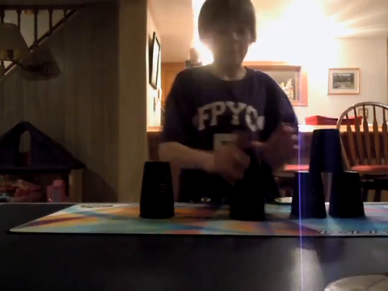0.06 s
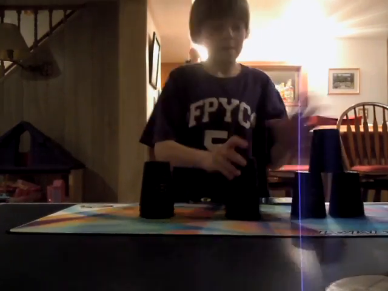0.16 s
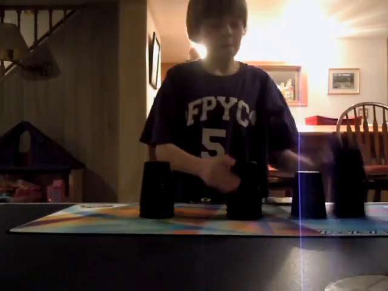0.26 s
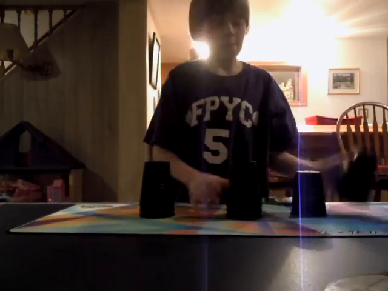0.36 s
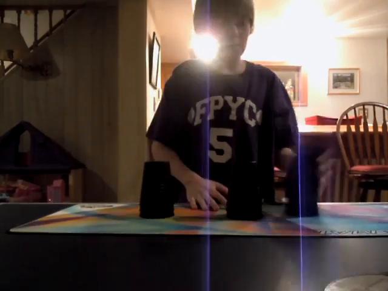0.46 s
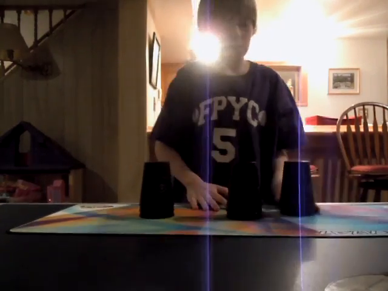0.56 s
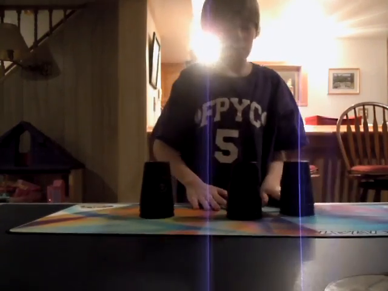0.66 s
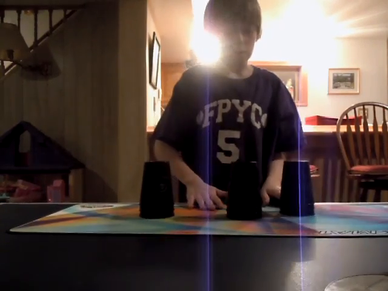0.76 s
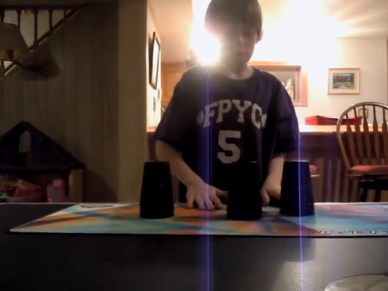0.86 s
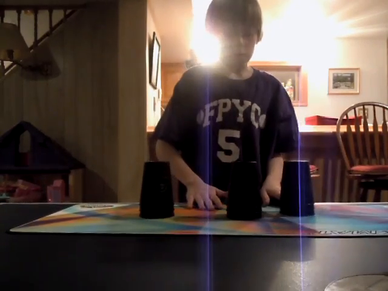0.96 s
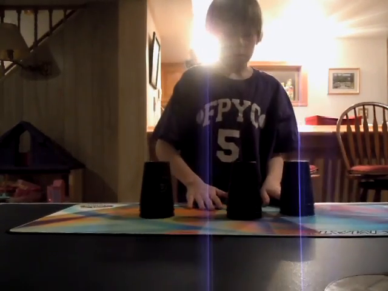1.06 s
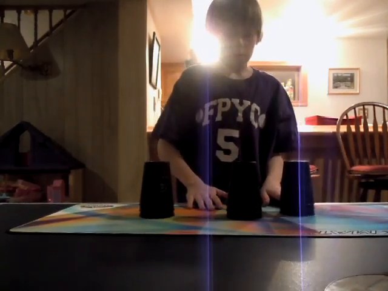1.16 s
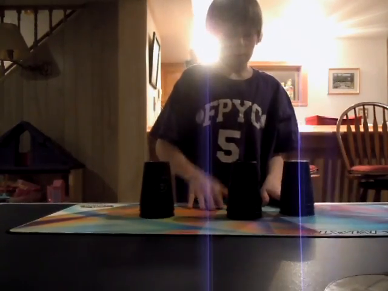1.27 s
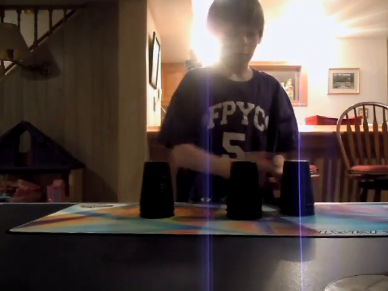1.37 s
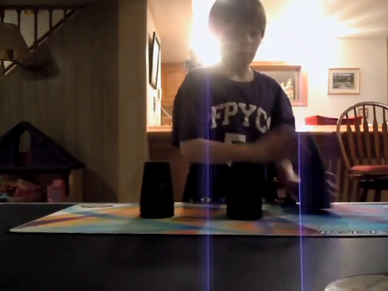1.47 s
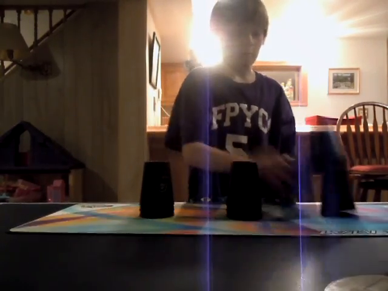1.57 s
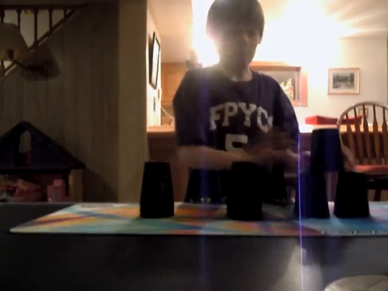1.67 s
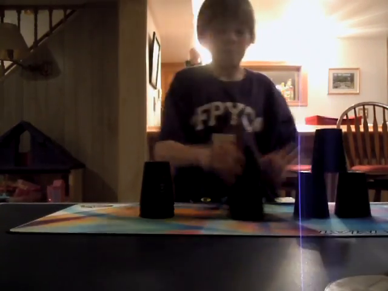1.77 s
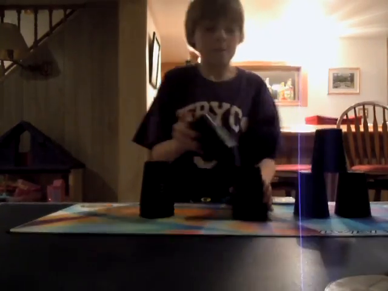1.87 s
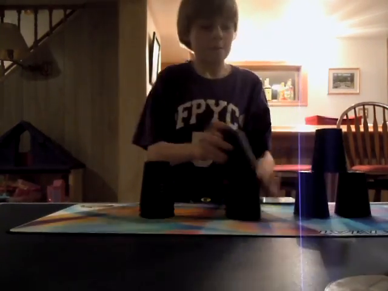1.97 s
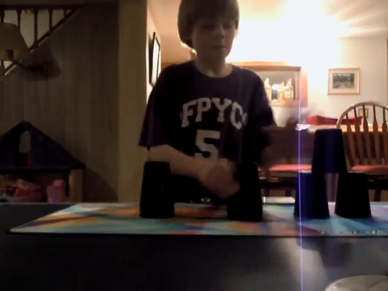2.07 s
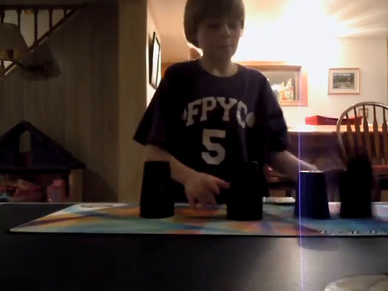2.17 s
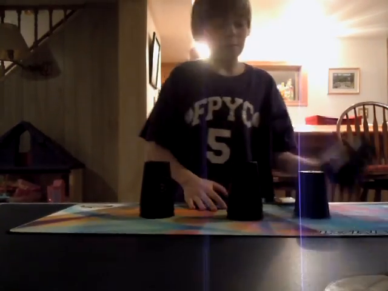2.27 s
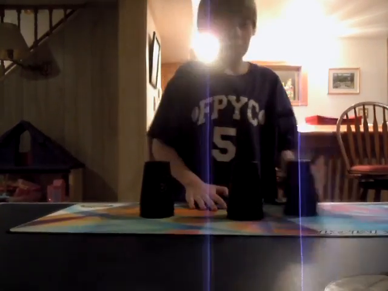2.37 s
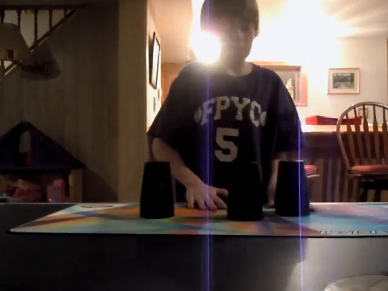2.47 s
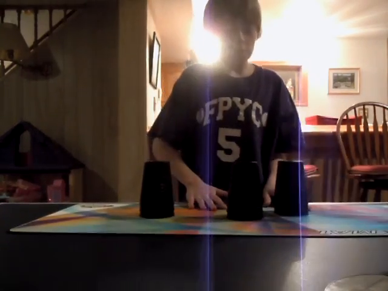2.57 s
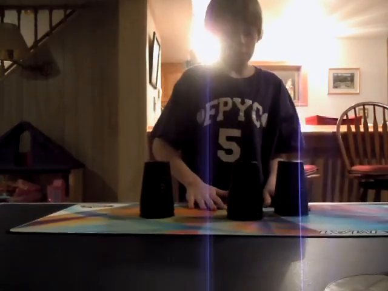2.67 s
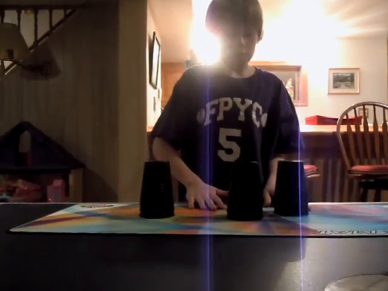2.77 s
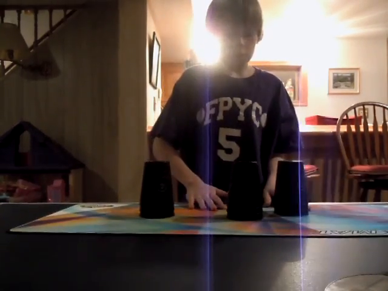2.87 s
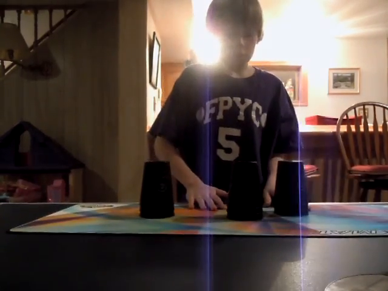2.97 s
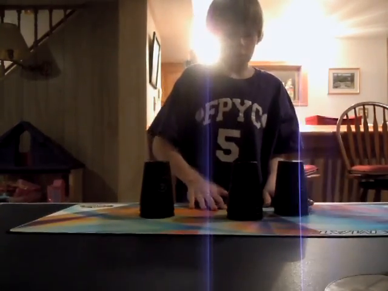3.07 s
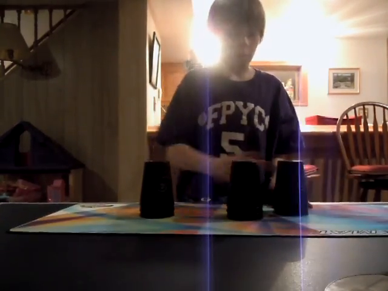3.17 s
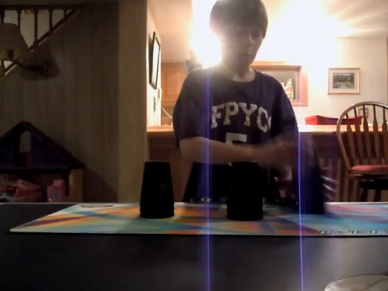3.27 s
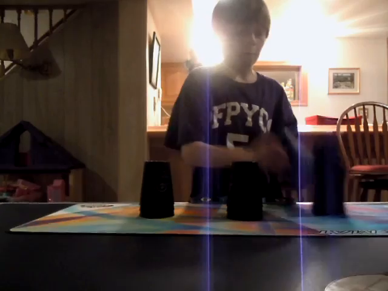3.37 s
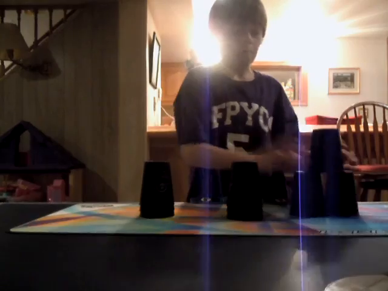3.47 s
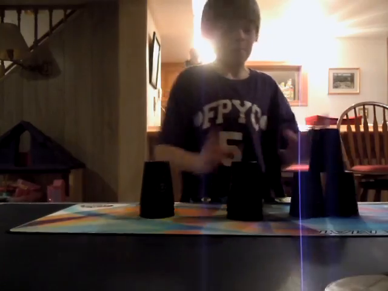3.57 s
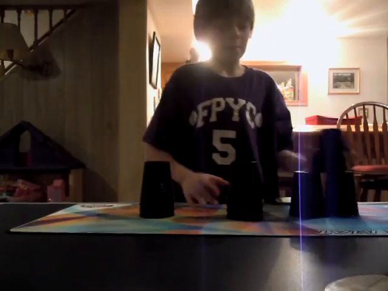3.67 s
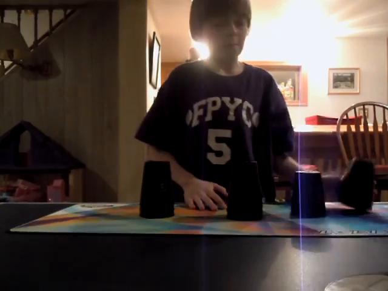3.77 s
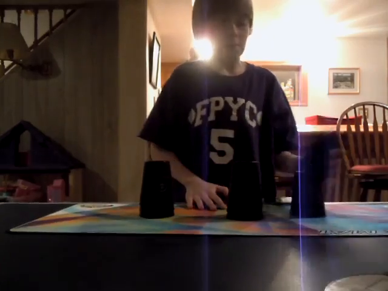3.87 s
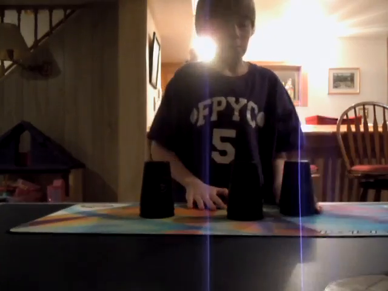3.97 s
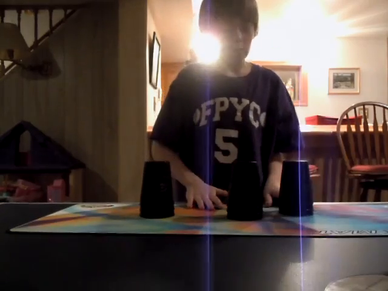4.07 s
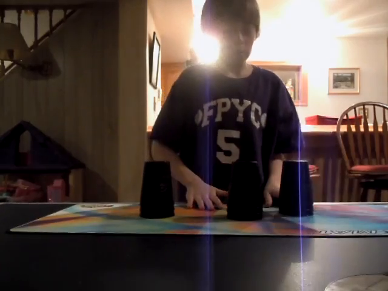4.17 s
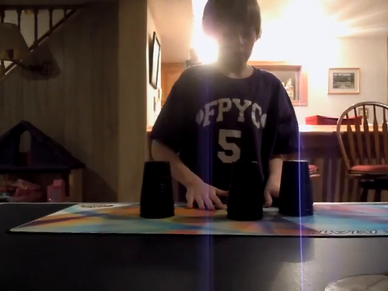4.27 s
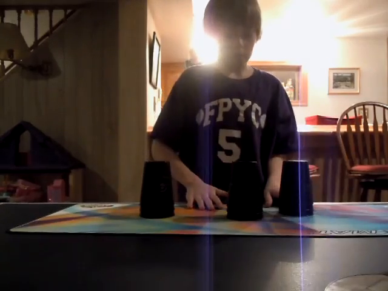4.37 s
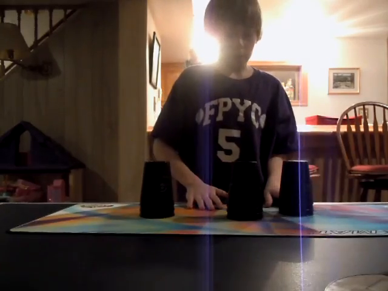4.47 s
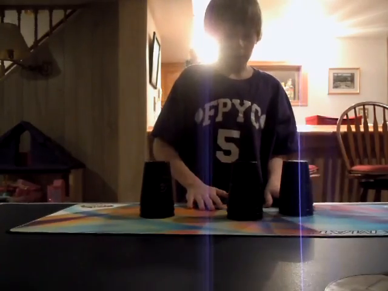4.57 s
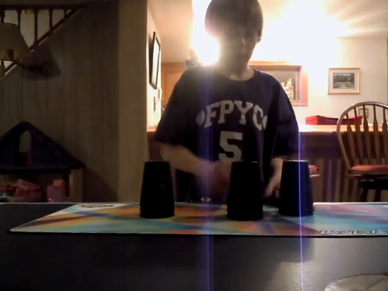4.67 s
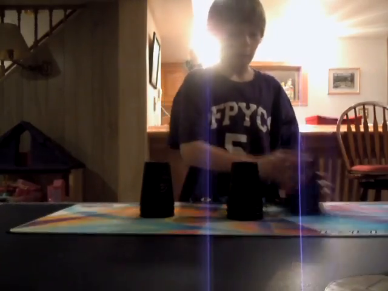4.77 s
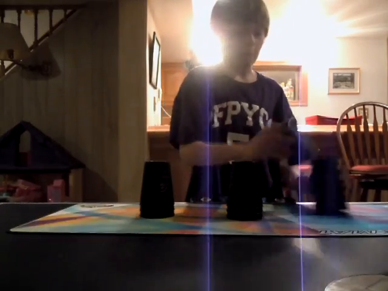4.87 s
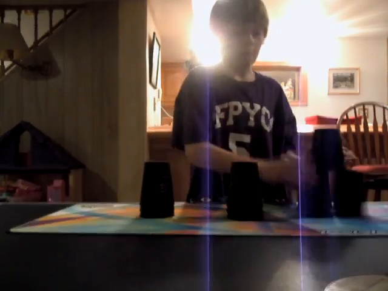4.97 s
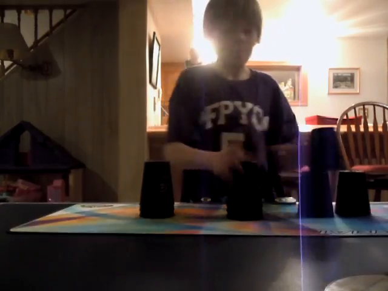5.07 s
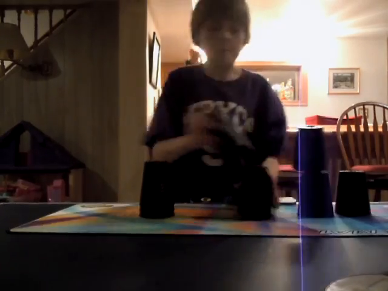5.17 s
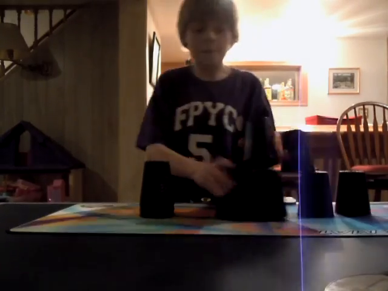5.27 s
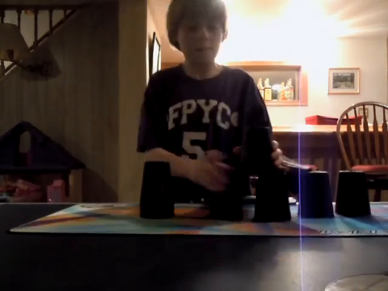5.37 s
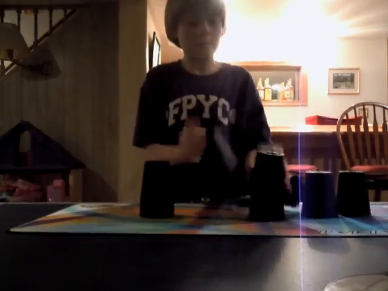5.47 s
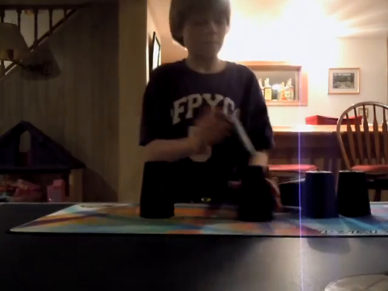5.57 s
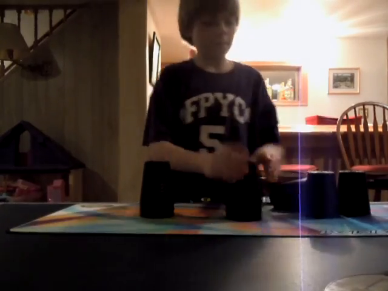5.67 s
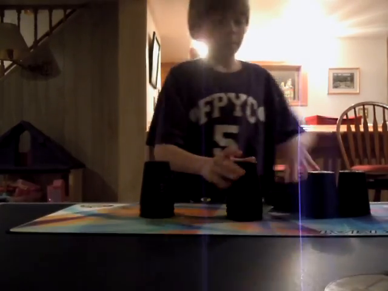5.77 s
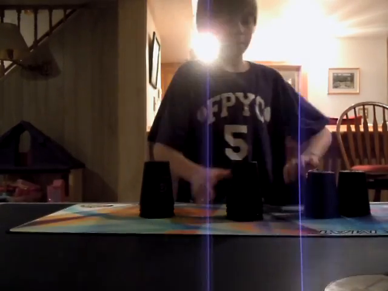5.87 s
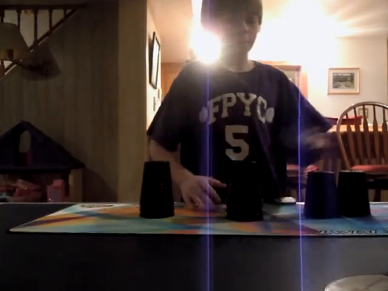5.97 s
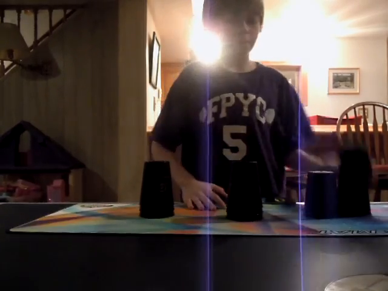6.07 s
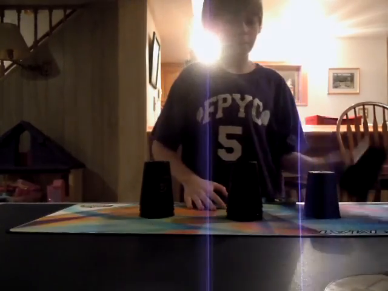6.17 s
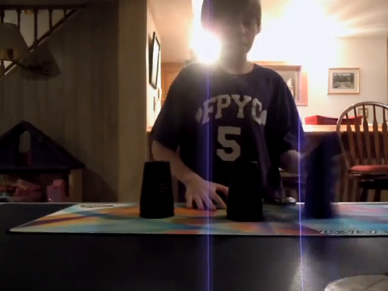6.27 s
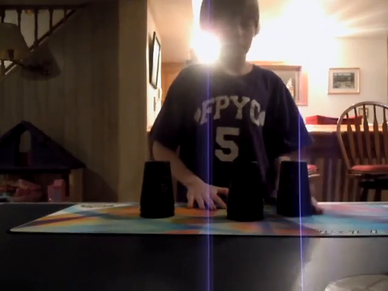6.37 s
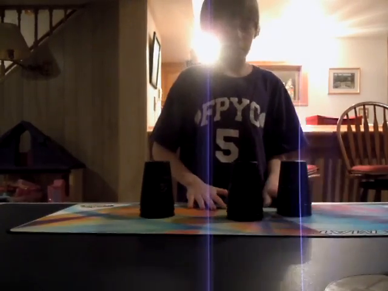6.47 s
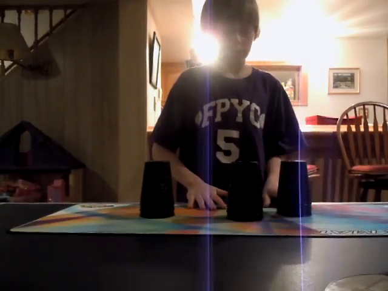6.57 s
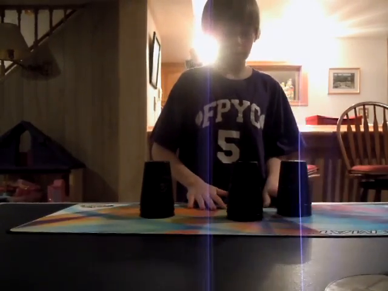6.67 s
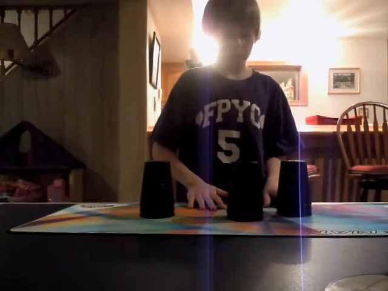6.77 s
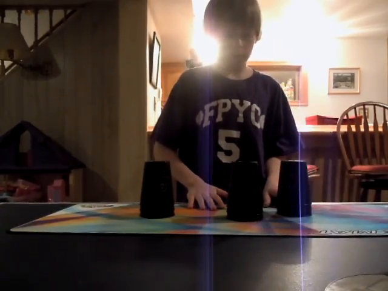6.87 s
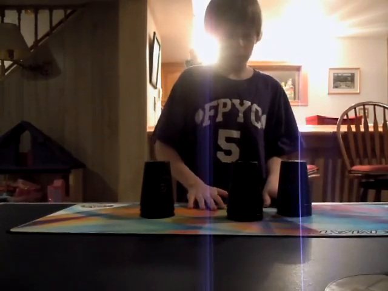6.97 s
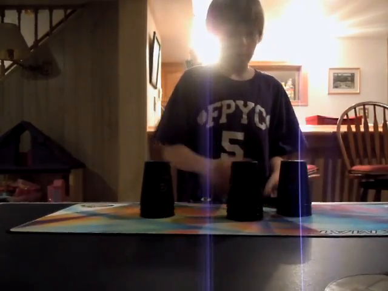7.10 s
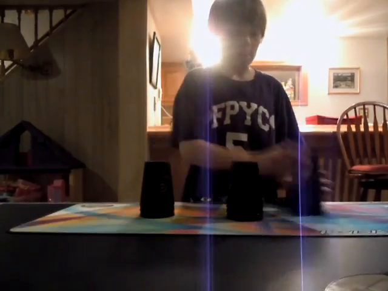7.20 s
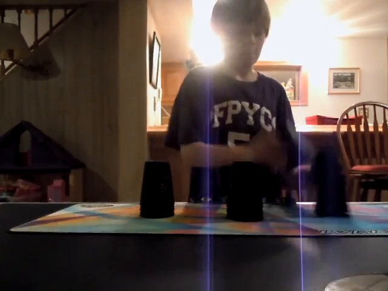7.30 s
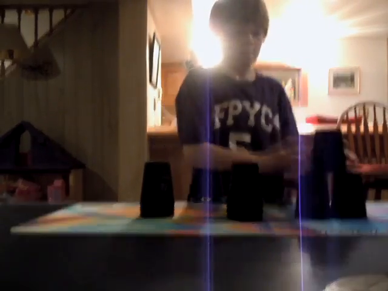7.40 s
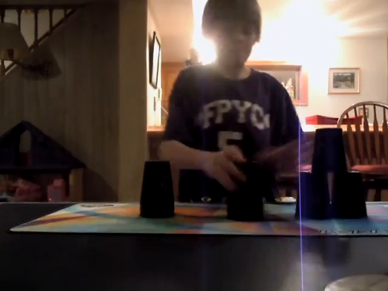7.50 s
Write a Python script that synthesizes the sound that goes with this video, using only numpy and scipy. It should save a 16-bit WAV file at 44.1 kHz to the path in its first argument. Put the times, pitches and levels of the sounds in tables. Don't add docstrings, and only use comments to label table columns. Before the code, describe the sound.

Hard plastic cups clack, slap and nest in rapid hollow bursts on a table mat, with short near-silent pauses, in a small room.

```python
import sys
import numpy as np
from scipy import signal
from scipy.fft import rfft, irfft
from scipy.io import wavfile
from scipy.ndimage import uniform_filter1d

SR = 44100
rng = np.random.default_rng(int(sys.argv[2]) if len(sys.argv) > 2 else 0)


def amplitude_ratio(level_db):
    exponent = np.asarray(level_db, float) / 20
    return 10 ** exponent


def digitize_waveform(pressure):
    field = np.atleast_2d(pressure).T
    bounded = np.clip(field, -1, 1)
    quanta = np.round(bounded * 32767).astype(np.int16)
    wavfile.write(sys.argv[1], SR, quanta)


N = 332514


def evened(x):
    return x / np.sqrt(np.mean(x ** 2) + 1e-20)


def peak_at(x, db):
    return amplitude_ratio(db) * x / abs(x).max()


def read(points, hz):
    f, value = np.transpose(points)
    return np.interp(np.log(hz + 1), np.log(f + 1), value)


def add(mix, s, sound):
    part = mix[max(round(s * SR), 0):][:len(sound)]
    part += sound[:len(part)]


def fade(t60, size):
    return amplitude_ratio(-60 * np.arange(size) / SR / max(t60, .003))


def ring(x, hz, t60):
    r = amplitude_ratio(-60 / max(t60, .003) / SR)
    w = 2 * np.pi * hz / SR
    return signal.lfilter([np.sin(w)], [1, -2 * r * np.cos(w), r * r], x)


def colour(points, size=512):
    hz = abs(np.fft.fftfreq(4096, 1 / SR))
    log_gain = np.log(amplitude_ratio(read(points, hz)) + 1e-5)
    return np.fft.ifft(np.exp(np.conj(signal.hilbert(log_gain)))).real[:size]


def hiss(points, likeness):
    hz = np.fft.rfftfreq(N, 1 / SR)
    left, other = rfft(rng.standard_normal((2, N)))
    same = np.clip(read(likeness, hz), 0, 1)
    right = same * left + np.sqrt(1 - same ** 2) * other
    return evened(irfft(np.array([left, right]) * amplitude_ratio(read(points, hz)), N))


def swell(start, end, db, rise_db, fall_db):
    t = np.arange(0, N, 256)[:, None] / SR
    rise = rise_db * np.maximum(start - t, 0)
    fall = fall_db * np.maximum(t - end, 0)
    power = amplitude_ratio(db - rise - fall) ** 2
    return np.interp(np.arange(N) / SR, t[:, 0], np.sqrt(power.sum(axis=1)))


# pitch_hz [Hz], level_db [dB per Hz]
HISS_TONE = [(29, -15.5), (50, 5.5), (292, -14.5), (776, -26.5), (1220, -30.5), (3170, -32.5), (3570, -34),
             (4020, -38.5), (13600, -39), (14900, -45)]
# pitch_hz [Hz], likeness [0 to 1]
HISS_LIKENESS = [(60, 0.92), (600, 0.8), (3000, 0.3), (6600, .05)]
# pitch_hz [Hz], level_db [dB]
WHINE = [(7838, -80), (7897, -85.5)]


def room_tone():
    t = np.arange(N) / SR
    whine = sum(amplitude_ratio(db) * np.sqrt(2) * np.sin(2 * np.pi * hz * t) for hz, db in WHINE)
    return amplitude_ratio(-56) * hiss(HISS_TONE, HISS_LIKENESS) + whine


# pitch_hz [Hz], t60_s [s to lose 60 dB]
ECHO_TIME = [(100, 1), (260, 0.41), (700, 0.38), (1600, 0.44), (4850, 0.34), (12000, 0.14)]
# pitch_hz [Hz], level_db [dB]
ECHO_WIDTH = [(60, -9.5), (400, -22.5), (1200, -15.5), (4300, -10.5), (8000, -4), (14500, 4)]


def room(x):
    taps = np.zeros((2, SR // 2))
    at = np.arange(120, SR // 2 - 20, 20) + rng.integers(0, 20, (2, (SR // 2 - 121) // 20))
    np.put_along_axis(taps, at, rng.choice([-1., 1.], at.shape), 1)
    hz, t, z = signal.stft(taps, SR, nperseg=256)
    z[1] *= amplitude_ratio(read(ECHO_WIDTH, hz))[:, None]
    decay = amplitude_ratio(-60 * t / read(ECHO_TIME, hz)[:, None]) + 1.5 * amplitude_ratio(-60 * t / 0.1)
    mid, side = signal.istft(z * decay, SR, nperseg=256)[1]
    echoes = np.array([mid + side, mid - side]) / np.linalg.norm(mid)
    return signal.fftconvolve(x[None], echoes, axes=1)[:, :N]


# start_s [s], level_db [dB]
PUSHES = [(.08, -38), (.44, -39.5), (.62, -45), (.9, -44.5), (1.46, -33.5), (1.81, -26), (2.0, -38),
          (2.17, -44), (2.34, -40.5), (3.24, -32.5), (3.37, -42.5), (3.72, -45), (3.93, -41), (4.85, -38),
          (5.1, -42.5), (5.401, -33.5), (5.72, -28), (5.97, -46), (6.419, -27.5), (6.68, -39.5),
          (7.28, -40.5)]


def table_sway():
    s, push_db = np.transpose(PUSHES)
    rumble = hiss([(10, -32.0), (21, -4.0), (27, 4.0), (38, -13), (70, -15), (140, -24.5), (300, -59.5)],
                  [(30, 0.89), (300, 0.81)])
    rumble *= amplitude_ratio(-60) + swell(s, s, push_db, rise_db=160, fall_db=71.5)
    return amplitude_ratio([[1.5], [-1.5]]) * rumble


# pitch_hz [Hz], likeness [0 to 1]
RUB_LIKENESS = [(60, 0.98), (370, 0.98), (2320, 0.96), (14500, 0.7)]
# pitch_hz [Hz], level_db [dB per Hz]
CHAFE_TONE = [(1200, -12.5), (2500, -3), (4000, -9.5), (6000, -6.5), (8000, 0), (10500, -18),
              (14200, -28.5)]
# start_s [s], end_s [s], chafe_db [dB], rustle_db [dB]
STROKES = [(0, .07, -34.5, -26), (0.106, 0.164, -42.5, -40.5), (0.286, 0.29, -29.5, -31),
           (0.442, 0.577, -50.5, -47.5), (0.649, 0.86, -61, -65.5), (1.266, 1.422, -62.5, -60.5),
           (3.086, 3.207, -62.5, -58), (4.628, 4.753, -61, -59), (1.468, 1.478, -39, -52),
           (1.497, 1.62, -51.5, -48.5), (1.7, 1.724, -36, -42.5), (1.824, 1.868, -39.5, -36.5),
           (2.168, 2.19, -38.5, -41.5), (2.332, 2.5, -56, -55), (3.26, 3.324, -38.5, -46.5),
           (3.415, 3.544, -43, -47.5), (3.717, 3.76, -44, -39), (3.902, 3.97, -43.5, -42),
           (4.796, 4.954, -46.5, -48), (5.08, 5.123, -40.5, -39.5), (5.272, 5.628, -45, -45),
           (5.684, 5.736, -51, -46), (5.905, 6.054, -69, -65.5), (6.143, 6.164, -40, -44.5),
           (6.398, 6.428, -46, -41.5), (6.65, 6.767, -55, -59.5), (6.844, 7.153, -60.5, -56),
           (7.257, 7.306, -40, -45.5), (7.494, 7.6, -55, -38.5)]


def handling():
    start, end, chafe_db, rustle_db = np.transpose(STROKES)
    slips = amplitude_ratio(2.6 * evened(uniform_filter1d(rng.standard_normal(N), 250)))
    chafe = evened(slips * hiss(CHAFE_TONE, RUB_LIKENESS))
    hollow = hiss([(90, -14.0), (160, 2.5), (800, -4.0), (1020, -3.5), (1200, -10.0), (2200, -30.5)],
                  RUB_LIKENESS)
    rustle = evened(slips * hollow)
    slopes = 297.5, 140
    return swell(start, end, chafe_db, *slopes) * chafe + swell(start, end, rustle_db, *slopes) * rustle


# pitch_hz [Hz], level_db [dB per Hz]
SCRAPE_TONE = [(710, -53), (1200, -27), (2410, -4.5), (3710, -27.5), (4780, -12.5), (6020, -22.5),
               (7130, -6), (14300, -34), (14900, -58.5)]
# pitch_hz [Hz], level_db [dB], t60_s [s]
SHELL = [(2577, 4, 0.066), (3870, -3, .07), (4930, 6.5, 0.042), (6760, -7.5, .02), (7460, -0.5, 0.021),
         (7350, -5, 0.013)]
# start_s [s], full_s [s], end_s [s], level_db [dB]
DRAGS = [
    (1.225, 1.348, 1.6, -55),
    (3.059, 3.133, 3.25, -41.5),
    (4.574, 4.655, 4.78, -54.5),
]


def drags():
    scrape = hiss(SCRAPE_TONE, RUB_LIKENESS)
    singing = evened(sum(amplitude_ratio(db) * ring(scrape, hz, 0.41 * t60) for hz, db, t60 in SHELL))
    scrape = evened(scrape + 0.11 * singing)
    t = np.arange(N) / SR
    gain = sum(amplitude_ratio(db) * np.interp(t, [start, full, end, end + 0.063], [0, 1, 1, 0]) ** 2
               for start, full, end, db in DRAGS)
    return scrape * gain


CLUSTER = [(.9, .55), (.96, .8), (1, 1), (1.045, .8), (1.11, .55)]


def upper_note(hz, db, noise, longer=1, spread=1, size=4096):
    blow = noise * (fade(0.023, size) + 0.18 * fade(.13, size))
    t60 = (0.014 + 30.0 / hz) * longer
    cluster = sum(share * ring(blow, hz * ratio ** spread, t60 * share) for ratio, share in CLUSTER)
    return peak_at(cluster, db - 0.5)


# start_s [s], level_db [dB]
OPEN_CUPS = [
    (.002, -17.5),
    (.262, -14.5),
    (1.672, -14.5),
    (3.377, -8),
    (3.501, -14),
    (5.012, -6.5),
    (5.185, -13),
    (5.325, -7.5),
    (7.418, -9.5),
]


def open_cups(spots):
    noise = rng.standard_normal((len(OPEN_CUPS), 4096))
    for k, ((s, db), n) in enumerate(zip(OPEN_CUPS, noise)):
        add(spots[k % len(spots)], s, upper_note(1030, db, n, longer=2.6, spread=.45))


# start_s [s], pitch_hz [Hz], level_db [dB]
WALL_NOTES = [(0.337, 2047, -5), (.338, 2618, -7), (0.5273, 1484, -4), (0.5269, 3840, -16.5),
              (1.654, 2388, -14), (1.656, 4877, -1.5), (2.075, 1490, -10.5), (2.075, 2890, -11.5),
              (2.224, 1770, -16), (2.224, 2570, -16.5), (2.226, 3870, -25), (2.404, 1682, -10.5),
              (3.4698, 3870, -9), (3.789, 1781, -7), (3.789, 2570, -3), (3.789, 3932, -17.5),
              (3.952, 1590, -5), (3.95, 3870, -17.5), (5.03, 2462, -18), (5.005, 4785, -15),
              (5.323, 2412, -12), (5.55, 3840, -20), (5.549, 1740, -19), (5.552, 2645, -10),
              (3.245, 1450, -24.5), (6.3468, 1634, 0), (6.3481, 3870, -18.5), (7.412, 2486, -13),
              (7.414, 3870, -7.5), (7.414, 4870, -6)]


def wall_notes(spots):
    noise = rng.standard_normal((len(WALL_NOTES), 4096))
    for k, ((s, hz, db), n) in enumerate(zip(WALL_NOTES, noise)):
        is_rim = abs(hz - 3870) < 200
        longer, spread = (2.8, .2) if is_rim else (1, 1)
        add(spots[k % len(spots)], s, upper_note(hz, db, n, longer, spread))


# pitch_hz [Hz], t60_s [s]
TABLE = [(329.2, 0.05), (218.4, 0.045), (168.2, 0.028), (124, 0.0093)]


def knock(row, noise, detune, taps, size=4096):
    s, crack_db, hollow_hz, hollow_db, thump_db, wall_db = row
    chatter_s = max(0.028 + .0004 * crack_db, .008)
    chatter = amplitude_ratio(-60 * (np.arange(size) / SR / chatter_s) ** 1.107)
    blow = noise * (chatter + 1.5 * fade(0.0063, size))

    snap = signal.oaconvolve(blow, taps)[:size]
    shell = sum(amplitude_ratio(db + 5 * e) * ring(blow, hz * (1 + 0.025 * d), t60)
                for (hz, db, t60), d, e in zip(SHELL, detune, detune[::-1]))
    crack = evened(snap) + amplitude_ratio(-13.0) * evened(shell)
    crack += (amplitude_ratio(wall_db) - 1) * signal.lfilter(*signal.butter(1, 3500, fs=SR), crack)

    push = signal.lfilter([1, -1], [1, -1.75, .77], .15 * blow + signal.unit_impulse(size))
    hollow_t60 = 23.0 / hollow_hz / (1 + (hollow_hz > 1150))
    air = ring(push, hollow_hz, hollow_t60)
    air += 0.18 * ring(push, hollow_hz * 1.3, hollow_t60 * .8)
    air += 0.52 * ring(push, hollow_hz * .75, hollow_t60 * 0.5)

    table = sum(ring(push, hz * (1 + 0.068 * d), t60) for (hz, t60), d in zip(TABLE, detune))
    return peak_at(crack, crack_db + 0.5) + peak_at(air, hollow_db - 2.0) + peak_at(table, thump_db + 0.5)


# pitch_hz [Hz], level_db [dB per Hz]
CRACK_TONE = [(880, -11), (1500, -8.5), (3530, -10.5), (3880, -5.5), (4570, -14.5), (4890, -9.5),
              (5540, -7), (8380, -2), (13400, -25.5), (14900, -41)]
# start_s [s], crack_db [dB], hollow_hz [Hz], hollow_db [dB]
SLAPS = [(0.2543, -10.5, 1231, -11), (0.2936, -2.5, 555.4, -12.5), (0.3085, -9, 811.5, -14.5),
         (0.3376, 5, 604, -14), (0.3434, -19, 674.5, -3), (1.622, -9, 663, 3), (1.6565, 10, 848, -3),
         (1.6648, 2, 756.6, 4.5), (1.6714, -4.5, 702, -8.5), (3.3775, -0.5, 708.6, -1),
         (3.4443, -14.5, 779, 0.5), (3.462, -5, 762, -11), (3.4694, 6, 772.5, -9.5),
         (3.4729, -8, 764.5, -4.5), (3.4823, -9.5, 1000, -7.5), (4.9755, -8, 669.4, -0.5),
         (4.996, 6.5, 746.4, -0.5), (5.0037, 5.5, 903, -0.5), (5.1842, -7.5, 998, -10),
         (5.316, -6, 1006, -8), (5.3225, 4, 913.5, -8), (5.3272, -4, 973, .5), (7.3951, -14, 634, -3),
         (7.4066, -1, 844, -6), (7.4139, 6, 852, 0.5), (7.4242, 0, 867, 2.5)]
# start_s [s], crack_db [dB], hollow_hz [Hz], hollow_db [dB], thump_db [dB]
NESTS = [(0.1261, -17.5, 505, -31, -25.5), (0.183, -17, 566, -37, -31), (0.5278, 1.5, 1220, -12, -15.5),
         (1.8505, -24, 593, -22.5, -12.5), (2.073, -4.5, 560, -27.5, -35), (2.0756, -8.5, 1340, -3, -9.5),
         (2.0797, -29.5, 1210, -15, -24), (2.2154, -13.5, 696, -18.5, -27), (2.2248, -1, 1320, -45, -42),
         (2.405, -2, 1400, -8.5, -18.5), (2.4097, -11.5, 1250, -27, -25), (3.779, -13.5, 586, -25, -32.5),
         (3.7889, -1.5, 840, -20.5, -29.5), (3.9524, -6, 816, -23, -17.5), (3.962, -14, 904, -25, -29.5),
         (5.4742, -17, 980, -18, -22), (5.5509, -6, 1220, -35, -46), (5.6973, -5, 1210, -22, -23.5),
         (6.334, -16.5, 620, -21.5, -10.5), (6.347, 2.5, 690, -16.5, -7)]
# start_s [s], crack_db [dB], hollow_db [dB], thump_db [dB]
GRABS = [(0.4797, -8, -18, -25.5), (0.4908, -10, -19, -35), (0.499, -3.5, -13.5, -23),
         (1.4325, -17, -34.5, -16.5), (1.6428, -5, -22.5, -23), (1.8324, -7, -24.5, -24),
         (1.9441, -31.5, -51, -23), (2.3604, -18, -27.5, -35), (3.2469, -20, -38.5, -15.5),
         (3.7329, -14, -27, -35), (3.7566, -13.5, -28.5, -34), (3.9035, -19, -21, -26),
         (4.7769, -16, -23, -18.5), (4.9469, -24.5, -31.5, -21.5), (5.2861, -10.5, -18.5, -23.5),
         (5.508, -15.5, -28, -31), (6.3004, -6, -13, -20.5), (7.2016, -14, -42, -20)]
# start_s [s], crack_db [dB], hollow_hz [Hz], hollow_db [dB]
TAPS = [(.0999, -23.5, 940, -31), (.1367, -19.5, 1060, -29), (.1877, -27.5, 1210, -23.5),
        (1.75, -22, 876, -18), (2.1524, -17, 853, -22), (2.312, -29, 710, -32.5), (2.384, -15, 690, -25),
        (3.2782, -20, 600, -30.5), (3.3065, -19, 666, -27), (3.4558, -17.5, 688, -22.5),
        (3.692, -36, 930, -34), (3.7101, -26, 995, -19), (3.931, -18, 544, -30),
        (4.8172, -13.5, 680, -22.5), (4.8569, -20.5, 690, -23), (5.3087, -17, 483, -25),
        (5.4155, -20.5, 1010, -22), (5.4469, -27, 960, -20), (5.6115, -31.5, 850, -39),
        (5.642, -19, 740, -33), (6.123, -13.5, 1200, -25)]
# start_s [s], crack_db [dB], wall_db [dB]
TICKS = [(0.321, -5, -12.5), (1.5573, -27.5, -12), (2.0129, -21.5, -18.5), (2.0453, -23.5, 1.5),
         (2.1894, -8.5, -21), (3.3287, -16, -12.5), (3.922, -20, -7), (4.406, -50.5, 5), (4.902, -21.5, -8),
         (5.1707, -12.5, 3.5), (5.6289, -19.5, -14), (5.649, -14, -21), (5.6858, -29, 1),
         (5.8688, -35.5, -1), (6.092, -10, -19.5), (6.115, -14.5, -9), (6.315, -9, -8), (5.995, -40, 13.5),
         (6.875, -47, -17), (6.9937, -35.5, -20.5), (7.045, -41, -19.5), (7.124, -37, 3), (7.2322, -16, -6),
         (7.262, -19, -14), (7.2764, -16.5, 0), (7.3336, -22.5, -8)]


def knocks(spots):
    # start_s, crack_db, hollow_hz, hollow_db, thump_db, wall_db
    rows = [(s, crack, hz, hollow, -19.5 + .7 * hollow, -1) for s, crack, hz, hollow in SLAPS]
    rows += [(*row, 7) for row in NESTS]
    rows += [(s, crack, 510, hollow, thump, -13.5) for s, crack, hollow, thump in GRABS]
    rows += [(s, crack, hz, hollow, hollow - 12, -4) for s, crack, hz, hollow in TAPS]
    rows += [(s, crack, 770.5, crack - 18, crack - 29, wall) for s, crack, wall in TICKS]
    taps = colour(CRACK_TONE)
    noise = rng.standard_normal((len(rows), 4096))
    detune = rng.standard_normal((len(rows), len(SHELL)))
    for k, (row, n, d) in enumerate(zip(rows, noise, detune)):
        add(spots[k % len(spots)], row[0], knock(row, n, d, taps))


def scene():
    spots = np.zeros((3, N))
    knocks(spots)
    wall_notes(spots)
    open_cups(spots)
    cups = spots.sum(axis=0)
    slope = 0.11 * np.gradient(cups)
    near = np.array([cups - slope, cups + slope])
    echoes = amplitude_ratio(-8.0) * sum(room(spot) for spot in spots)
    return near + echoes + drags() + handling() + table_sway() + room_tone()


def low_pass(x):
    return signal.sosfilt(signal.butter(12, 15070, fs=SR, output="sos"), x)


def record(dry):
    heard = signal.oaconvolve(dry, signal.firwin(255, 14200, fs=SR)[None], "same")
    loud = np.clip(heard, -1, 1)
    smooth = signal.oaconvolve(loud, signal.firwin(127, 15000, fs=SR)[None], "same")
    mix = np.clip(.3 * loud + .7 * smooth, -1, 1)
    return low_pass(mix)


dry = scene()
out = record(dry)
digitize_waveform(out)
```